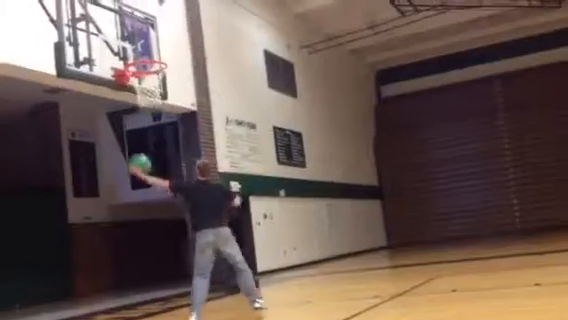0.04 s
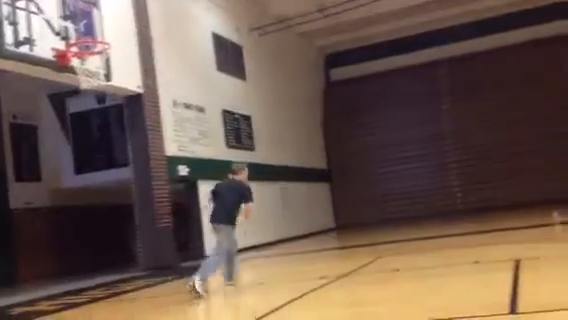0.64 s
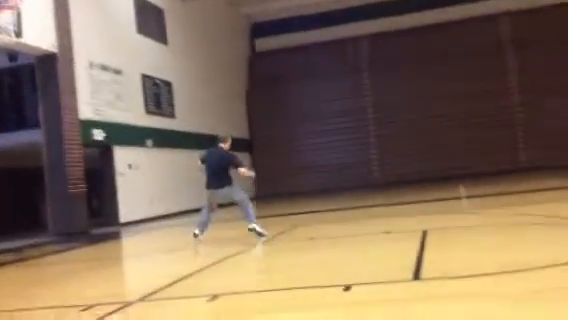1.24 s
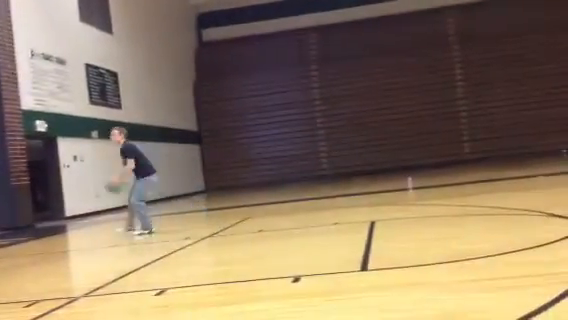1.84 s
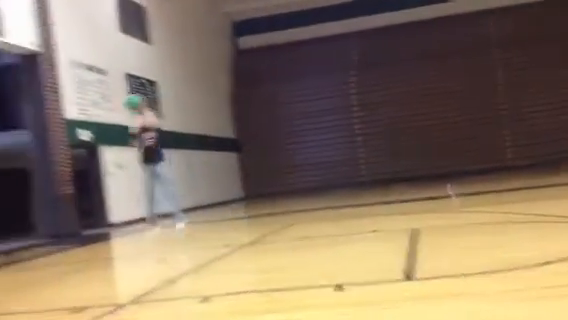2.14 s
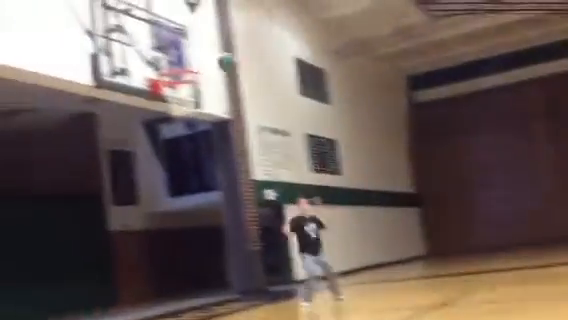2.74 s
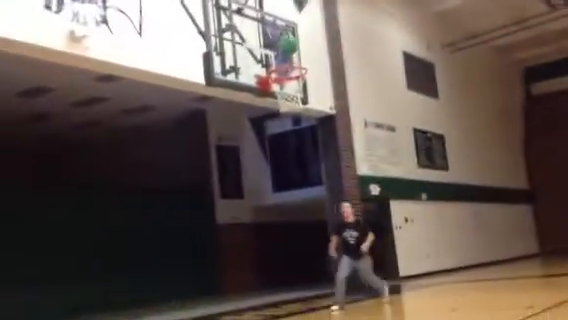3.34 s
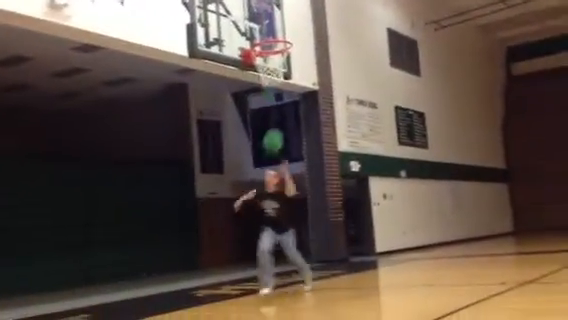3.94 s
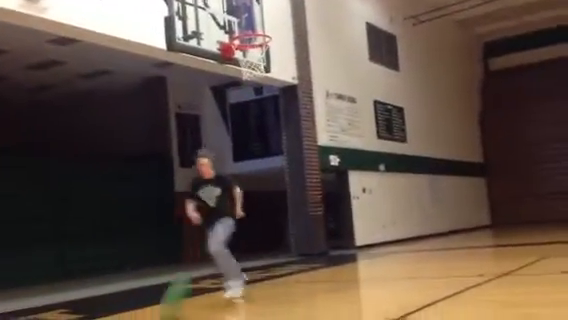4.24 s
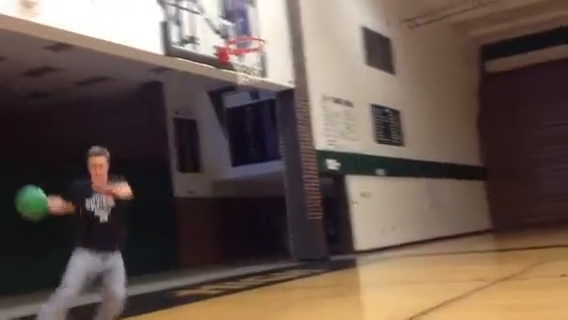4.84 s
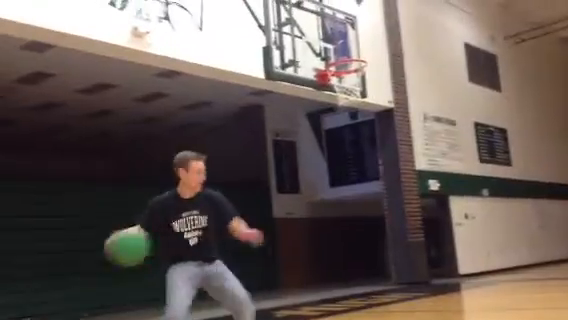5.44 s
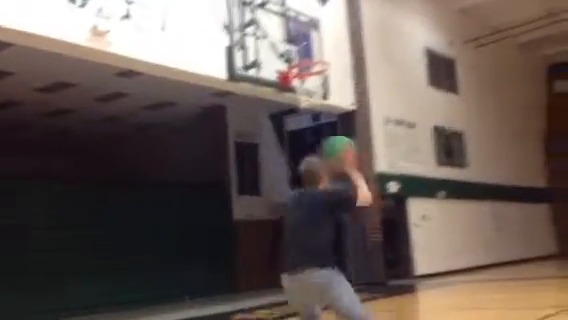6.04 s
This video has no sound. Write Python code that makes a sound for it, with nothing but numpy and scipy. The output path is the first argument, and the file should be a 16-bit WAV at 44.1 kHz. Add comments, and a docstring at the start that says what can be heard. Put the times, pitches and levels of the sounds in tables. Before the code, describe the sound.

In a big echoing gym, hands clap on a basketball and it slaps the hardwood a few times at a distance. After some scuffing steps, the ball shakes the hoop and backboard, leaving the rim rattling briefly. A short shoe squeak and a catch lead into more dribbling, now sharp and near the microphone. Soft fabric swishes and a faint air hum lie beneath the long reverberation.

```python
"""A basketball slaps and thumps on the hardwood of a large empty gym, the hall already ringing.
A player dribbles, jumps, shoots and fetches the rebound: hands clap on rubber, soles scuff and squeak,
clothes and net swish. The shot shakes the hoop, whose sprung rim chatters to rest. Walls throw back
single echoes of each bounce, then the hall rings for over two seconds above faint ventilation air."""
import sys
import numpy as np
from scipy import signal
from scipy.fft import rfft, irfft
from scipy.io import wavfile
from scipy.ndimage import uniform_filter1d, minimum_filter1d

SR = 44100
rng = np.random.default_rng(int(sys.argv[2]) if len(sys.argv) > 2 else 0)


def wav_out(sig):
    """Save sig, one row per channel (or a flat mono array), as 16-bit PCM at SR to the path in sys.argv[1]."""
    wavfile.write(sys.argv[1], SR, np.round(np.clip(np.atleast_2d(sig).T, -1, 1) * 32767).astype(np.int16))


N = 269010
TIME = np.arange(N) / SR

# Contact colours: rubber slap, hollow knock, top-end crack. Each row: frequency in Hz, level in dB.
SLAP = [(200, -45), (1000, -12), (2000, -10), (3200, -5), (4000, -5), (4900, 3), (5600, -1.5),
        (6600, -10.5), (9000, -28), (15000, -25.5)]
KNOCK = [(100, -20), (350, 3), (550, -3), (1100, -1), (2200, -7.5), (4000, -13.5), (9000, -31)]
CRACK = [(2000, -50), (5000, -64.5), (7200, 15), (10000, 24), (13000, 17.5), (16000, -17.5)]


def undb(db):
    """Decibels to gain."""
    return 10 ** (np.asarray(db) / 20)


def unit(x):
    """Scale to an energy of one."""
    return x / np.sqrt(np.sum(x ** 2))


def fade(t60, size):
    """Exponential decay, 60 dB down after t60 seconds."""
    return np.exp(-np.log(1000) * TIME[:size] / t60)


def add(track, s, x):
    """Mix x into the track from s seconds on."""
    start = int(s * SR)
    track[start:start + len(x)] += x[:N - start]


def flutter(rate):
    """Random wavering with a spread near one, taking rate turns a second."""
    knots = rng.standard_normal(int(N / SR * rate) + 2)
    return np.interp(TIME * rate, np.arange(len(knots)), knots)


def colour(x, points, size=2048):
    """Causal filter through (Hz, dB) points, keeping the energy of white input."""
    hz, db = np.transpose(points)
    bins = np.maximum(np.arange(size // 2 + 1) * SR / size, 1)
    gain = undb(np.interp(np.log(bins), np.log(hz), db))
    cepstrum = irfft(np.log(gain))
    cepstrum[1:size // 2] *= 2  # minimum phase keeps attacks sharp
    cepstrum[size // 2 + 1:] = 0
    response = unit(irfft(np.exp(rfft(cepstrum))))
    return signal.fftconvolve(x, response)[:len(x)]


def pulse(points, size=8192):
    """A single clean tick of this colour."""
    return unit(colour(signal.unit_impulse(size), points))


def burst(points, t60, tick, size=8192):
    """A contact: one sharp tick and a dying spray of tiny slips."""
    push = unit(rng.standard_normal(size) * fade(t60, size))
    push[0] += tick
    return unit(colour(push, points))


def thump(hz, t60, contact_s, size=8192):
    """A short low thud: a body squashes and springs back in a few swings."""
    swell = 1 - np.exp(-TIME[:size] / contact_s)
    return unit(np.sin(2 * np.pi * hz * TIME[:size]) * swell * fade(t60, size))


def ring(modes, size=44100):
    """A struck body rings in decaying sines, a little detuned on every blow."""
    tone = np.zeros(size)
    for hz, db, t60 in modes:
        detuned_hz = hz * (1 + 0.0072 * rng.standard_normal())
        tone += undb(db) * np.sin(2 * np.pi * detuned_hz * TIME[:size]) * fade(t60, size)
    return unit(tone)


def hall_ring(first_s, build_s):
    """The gym's diffuse tail: silent until the first walls answer, then each band dies at its own pace."""
    # The hall's ring. Each row: frequency in Hz, level in dB, t60 in seconds.
    decays = [(66, -5.5, 3.8), (101.7, 2.5, 3.8), (160, 3.5, 2.4), (267, 0.5, 3.56), (480, 6.5, 2.87),
              (1100, 1, 3.24), (2140, 1, 2.28), (4800, -10, 1.5), (7500, -6.5, 0.63), (13340, -16, 0.44)]
    hz, db, t60 = np.transpose(decays)
    log_centres = np.log(np.geomspace(50, 16000, 18))
    log_bins = np.log(np.maximum(np.arange(N // 2 + 1) * SR / N, 1))
    band_of_bin = np.interp(log_bins, log_centres, np.arange(len(log_centres)))
    clumps = undb(3 * flutter(rate=400) * fade(3, N))  # early reflections bunch up, later ones even out
    onset = np.clip((TIME - first_s) / build_s, 0, 1)
    noise, tail = rfft(rng.standard_normal(N)), np.zeros(N)
    for k, centre in enumerate(log_centres):
        band = irfft(noise * np.maximum(1 - abs(band_of_bin - k), 0), N)
        envelope = unit(onset * fade(np.interp(centre, np.log(hz), t60), N))
        tail += band * undb(np.interp(centre, np.log(hz), db)) * envelope
    return tail * clumps


def lingering_bounce(hall):
    """The hall still rings from a bounce half a second before the scene opens."""
    body = undb(-14) * thump(hz=192, t60=0.036, contact_s=0.004)
    bounce = body + undb(-14.5) * pulse(KNOCK) + undb(-5.5) * pulse(SLAP)
    return signal.fftconvolve(bounce, hall)[SR // 2:]


def ventilation():
    """Moving air lays a faint, steady bed of noise."""
    # Colour of the air. Each row: frequency in Hz, spectral level in dB.
    air = [(30, -22), (120, -18.5), (400, 2), (1500, -32.5), (5000, -14.5), (8000, -25.5), (15000, -36)]
    return undb(-66.5) * colour(rng.standard_normal(N), air)


def touches(rows, points, thud_hz, slap_t60, knock_db):
    """Light, quick claps, each with a small thud and a knock that follows the thud's strength."""
    direct, send = np.zeros((2, N))
    for s, slap_db, thud_db, send_db in rows:
        thud = undb(thud_db) * thump(hz=thud_hz, t60=0.02, contact_s=0.0072)
        slap_gain, knock_gain = undb(slap_db), undb(thud_db + knock_db)
        slap = slap_gain * burst(points, t60=slap_t60, tick=1.07)
        knock = knock_gain * burst(KNOCK, t60=0.073, tick=0.17)
        add(direct, s, thud + slap + knock)
        add(send, s, undb(send_db) * (thud + slap_gain * pulse(points) + knock_gain * pulse(KNOCK)))
    return direct, send


def hands():
    """Palms meet the ball in tight, bright claps."""
    # Hands on the ball. Each row: start in seconds, then slap, thud and hall send in dB.
    claps = [ (0.0705, -20, -25.5, 7.5), (0.1080, 0, -21.5, -9), (0.8650, -10.5, -11, 0),
             (1.9797, -23, -30, 4.5), (2.0310, -32, -43, 2), (4.0842, -23.5, -15.5, -1),
             (4.1033, -8, -13.5, -1.5), (4.1272, -16, -14, -2.5), (4.9160, -20, -19.5, 0.5),
             (4.9466, -25, -19.5, -12), (5.5062, -15.5, -22, 5), (6.0656, -10, -12, 8),
             (6.0888, -14.5, -18, 3)]
    # Colour of a palm on rubber. Each row: frequency in Hz, level in dB.
    palm = [(200, -36), (1000, -18.5), (2300, -5.5), (3200, 3), (4000, -2), (4900, 8), (5700, -3),
            (6800, -16.5), (9000, -30), (15000, -34.5)]
    return touches(claps, palm, thud_hz=278, slap_t60=0.0087, knock_db=-1)


def clothes_and_net():
    """Fabric rubs in grainy swishes that swell and fade over a constant faint rustle."""
    # Swishes. Each row: start in seconds, length in seconds, level at the crest in dB.
    swishes = [(0.32, 0.13, -59), (2.155, 0.068, -70), (2.367, 0.074, -76), (2.689, .2, -72),
               (2.937, 0.5, -62.5), (3.63, 0.09, -66), (4.02, 0.38, -64), (4.74, 0.31, -60.5)]
    # Colour of rubbing cloth. Each row: frequency in Hz, level in dB.
    cloth = [(1000, -37), (4000, 7.5), (7000, 3.5), (10000, -1), (14000, 8.5), (16000, -5.5)]
    envelope = np.full(N, undb(-76.5))
    for s, length_s, db in swishes:
        envelope += undb(db) * np.sin(np.pi * np.clip((TIME - s) / length_s, 0, 1))
    folds_db = 3 * flutter(rate=20) + 3.5 * flutter(rate=120)
    return envelope * undb(folds_db) * colour(rng.standard_normal(N), cloth)


def dribbles():
    """The ball hits the boards: a rubber slap on a low thump, then single echoes from ceiling and walls."""
    # Bounces. Each row: start in seconds, metres across and along from the microphone, slap, knock
    # and thump in dB, thump pitch in Hz, hall sends of the slap and of the thump in dB.
    bounces = [ (0.3380, -1.2, 11.7, -7, -13.5, 2.5, 220, 4.5, -6.5),
               (0.9985, 4.5, 7.6, 5.5, -7.5, -11.5, 147, -1.5, 3.5),
               (1.4333, 5, 7.7, -6, -14, -9.5, 193, 5, 0.5),
               (4.3567, 2.4, 8.2, 5.5, -3, -3, 174, -4.5, -3.5),
               (5.2348, -2, 2.7, 5.5, -10, -7, 175, -5.5, -5.5),
               (5.6002, -2.4, 2.57, 16, 3, 5, 232, -6.5, -7.5)]
    # Boards and the air inside the ball. Each row: frequency in Hz, level in dB, t60 in seconds.
    ball_modes = [(474, 0, 0.74), (787, -1, 0.22), (1148, -2, 0.26), (1940, -7, .06), (2936, -5, 0.043)]
    # The microphone mirrored in ceiling and walls. Each row: metres across, along and up,
    # echo level in dB relative to the hall send.
    mirrors = [(4.5, -6.5, 18.5, -15.5), (-40.5, 10, 2, -28), (5, -44, 2.5, -19), (43.5, 37.55, 0, -15.5),
               (72.5, 0.49, 0, -19.5), (90.5, -26.94, 1.5, -27.5)]
    sound_m_s = 343
    direct, send = np.zeros((2, N))
    for s, across_m, along_m, slap_db, knock_db, thump_db, thump_hz, send_db, boom_db in bounces:
        slap_gain, knock_gain, crack_gain = undb([slap_db, knock_db, slap_db - 17])
        body = undb(thump_db) * thump(hz=thump_hz, t60=0.019, contact_s=0.0047)
        # the deeper the squash, the more boards and ball ring on
        hollow = undb(thump_db - 21.5) * ring(ball_modes, size=8192)
        slap = slap_gain * burst(SLAP, t60=0.012, tick=1.1)
        crack = crack_gain * burst(CRACK, t60=0.008, tick=0.8)
        knock = knock_gain * burst(KNOCK, t60=0.043, tick=0.81)
        add(direct, s, body + hollow + slap + crack + knock)
        # a soft pop as the ball leaves the floor
        add(direct, s + 0.011, undb(knock_db - 13) * burst(KNOCK, t60=0.029, tick=0.372))
        # summed over all directions, the ball radiates a smooth spectrum
        smooth = slap_gain * pulse(SLAP) + knock_gain * pulse(KNOCK) + crack_gain * pulse(CRACK)
        radiated = undb(send_db) * smooth
        add(send, s, radiated + undb(boom_db) * (body + hollow))
        outgoing = radiated + undb(boom_db - 4.5) * body
        ball = np.array([across_m, along_m, 0])
        for *mirror, echo_db in mirrors:
            lag_s = (np.linalg.norm(mirror - ball) - np.linalg.norm(ball)) / sound_m_s
            add(direct, s + lag_s, undb(echo_db) * wall_echo(outgoing, lag_s))
    return direct, send


def wall_echo(x, lag_s):
    """An uneven wall smears an echo over a few milliseconds; the longer the path, the duller."""
    loss_db = 32 * lag_s
    wall = [(100, 0.0014), (2600, 0), (5000, -loss_db), (12000, -9 - 2 * loss_db)]
    return signal.fftconvolve(x, burst(wall, t60=0.038, tick=0.69))


def footsteps():
    """Shoes land on the boards with a scuffing slap and a low thud."""
    # Steps. Each row: start in seconds, then slap, thud and hall send in dB.
    steps = [ (0.6660, -27, -32, 2), (0.8195, -25.5, -29, 14.5), (1.4030, -21, -20.5, 3.5),
             (2.6668, -14, -20.5, 6), (2.7195, -17.5, -19, 5.5), (2.8200, -23, -25, -17),
             (3.7826, -25.5, -31.5, 10.5), (4.8192, -30, -18, -2.5), (4.8400, -19, -25, 7)]
    return touches(steps, SLAP, thud_hz=201, slap_t60=0.042, knock_db=-4.5)


def sole_squeaks():
    """Rubber soles stick and slip at an unsteady pitch, heard mostly by way of the hall."""
    # Squeaks. Each row: start and length in seconds, first and last pitch in Hz, hall send level in dB.
    slips = [(2.814, 0.043, 3420, 3390, -19.5), (2.853, 0.058, 2930, 2940, -38),
             (4.039, 0.08, 5060, 5160, -12)]
    send = np.zeros(N)
    for s, length_s, start_hz, end_hz, db in slips:
        size = int(length_s * SR)
        hz = np.linspace(start_hz, end_hz, size) * (1 + 0.1 * flutter(rate=1500)[:size])
        tone = np.sin(2 * np.pi * np.cumsum(hz) / SR)
        add(send, s, undb(db) * unit(np.hanning(size) * tone))
    return undb(-7) * send, send


def hoop_rattle():
    """The shot grinds on the rim and shakes the backboard; loose fittings click with each blow."""
    # Blows of the ball. Each row: start in seconds, clatter level in dB.
    blows = [(3.007, -12.5), (3.0230, -9.5), (3.0470, -5), (3.0620, -9), (3.0780, -9.5), (3.0950, -8.5)]
    # Ring of hoop and backboard. Each row: frequency in Hz, level in dB, t60 in seconds.
    hoop_modes = [(178, -12, .5), (269, 0, .22), (371, -12, .4), (468, -7, .4), (581, -7, .3),
                  (791, -11, .3), (862, -7, .25), (1090, -6, .3), (1443, -7, .3), (1615, -5, .25),
                  (2487, -11, .25), (3171, -12, .3)]
    # Colours of the frame's clatter and its fittings. Each row: frequency in Hz, level in dB.
    clatter = [(60, -29), (140, 7.5), (280, 4.5), (600, 0), (1400, 0), (2100, -6.5), (3200, -4.5),
               (5300, -5.5), (7000, -20), (14000, -58)]
    fittings = [(500, 9), (1500, -11), (3200, 6), (5200, -12), (7000, -16), (14000, -17)]
    frame = np.zeros(N)
    add(frame, blows[0][0], undb(-17.5) * burst(SLAP, t60=0.025, tick=0.51))
    for s, db in blows:
        add(frame, s, undb(db) * burst(clatter, t60=0.17, tick=0.16))
        add(frame, s, undb(db - 11) * ring(hoop_modes))
        add(frame, s + 0.0027, undb(db - 11.5) * burst(fittings, t60=0.021, tick=0.29))
    return frame, undb(-2.5) * frame


def rim_chatter():
    """The sprung rim taps its stop once a swing, rattling after each tap, until friction stills it."""
    # Steel of the spring hinge. Each row: frequency in Hz, level in dB, t60 in seconds.
    steel_modes = [(4700, -15, .2), (4820, -3, 0.25), (5230, 17, 0.18), (6300, 10, 0.22)]
    # Colour of a tap on the stop. Each row: frequency in Hz, level in dB.
    tap = [(300, -19.5), (2000, -21), (3500, -10.5), (4500, -6), (5400, -1), (6500, -16.5), (9000, -29.5),
           (14000, -36)]
    start_s, period_s, chatter_s = 3.1257, 0.0729, 0.033
    loss = 0.16  # share of the first swing's energy lost on each swing
    direct, send = np.zeros((2, N))
    for swing in range(7):
        s = start_s + period_s * swing
        db = -8 + 10 * np.log10(1 - loss * swing)
        steel = undb(db - 3.5) * ring(steel_modes)
        click = undb(db - 1) * burst(tap, t60=0.0092, tick=0.97)
        sizzle = undb(db + 2) * burst(tap, t60=0.31, tick=0)
        add(direct, s, steel)
        add(direct, s, click + sizzle)
        add(send, s, undb(db + 6) * pulse(tap))
        for late in rng.uniform(0.05, 1, size=3):
            rattle = undb(db - 6 - 7.3 * late) * burst(tap, t60=0.018, tick=0.89)
            add(direct, s + late * chatter_s, rattle)
    return direct, undb(0) * send


def clothes_ticks():
    """Clothes give off small, crisp ticks."""
    # Ticks. Each row: start in seconds, level in dB.
    ticks = [(4.8855, -29.5), (4.918, -28.5), (5.5160, -26.5)]
    direct = np.zeros(N)
    for s, db in ticks:
        add(direct, s, undb(db) * burst(CRACK, t60=0.012, tick=1))
    return direct, undb(-8) * direct


def scene():
    """Each contact gives a direct sound and a send into the hall; air and fabric lie underneath."""
    contacts = [hands(), footsteps(), dribbles(), hoop_rattle(), rim_chatter(), sole_squeaks(),
                clothes_ticks()]
    direct, send = np.sum(contacts, axis=0)
    hall = hall_ring(first_s=0.018, build_s=0.025)
    reverb = signal.fftconvolve(send, hall)[:N]
    add(reverb, 0, lingering_bounce(hall))
    return (direct + reverb + ventilation() + clothes_and_net())[None]


def limiter(x, ceiling, release_s):
    """Turns down at once for a peak over the ceiling, then recovers slowly."""
    excess = np.log(np.maximum(abs(x) / ceiling, 1))
    recovery = np.exp(-TIME / release_s)
    held = np.maximum.accumulate(excess / recovery, axis=-1) * recovery
    return x * uniform_filter1d(minimum_filter1d(np.exp(-held), size=65), size=33)


def record(dry):
    """A phone microphone: thin in the deep bass, limited on the nearest bounces, cut off at the top."""
    low_cut = signal.butter(3, 98, "high", fs=SR, output="sos")
    high_cut = signal.ellip(8, 0.2, 70, 15700, fs=SR, output="sos")
    thin = signal.sosfilt(low_cut, dry) + undb(-36) * dry
    return signal.sosfilt(high_cut, limiter(thin, ceiling=0.8, release_s=0.32))


dry = scene()
out = record(dry)
wav_out(out)
```